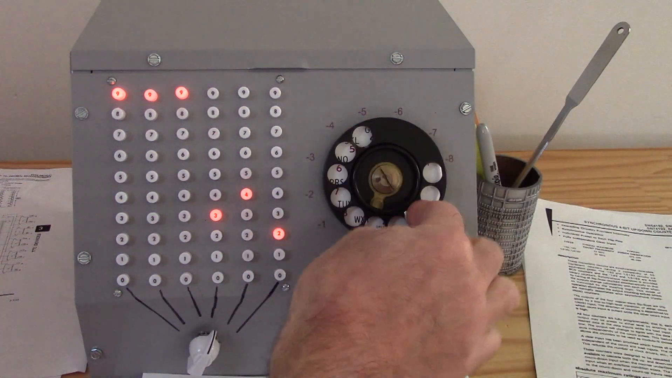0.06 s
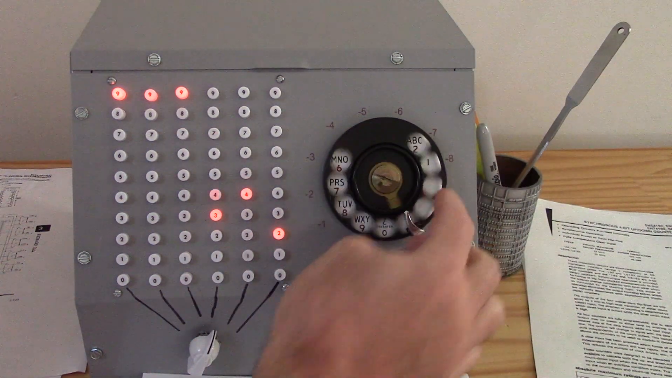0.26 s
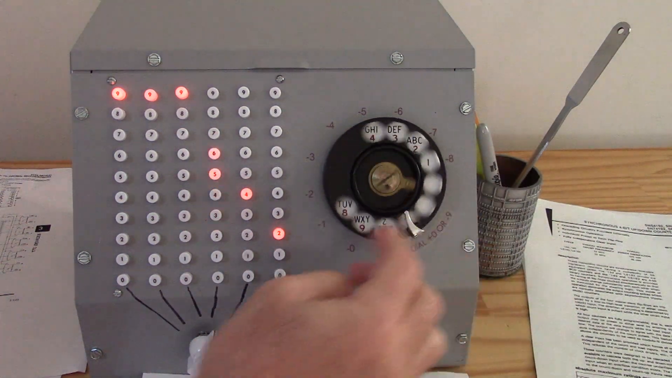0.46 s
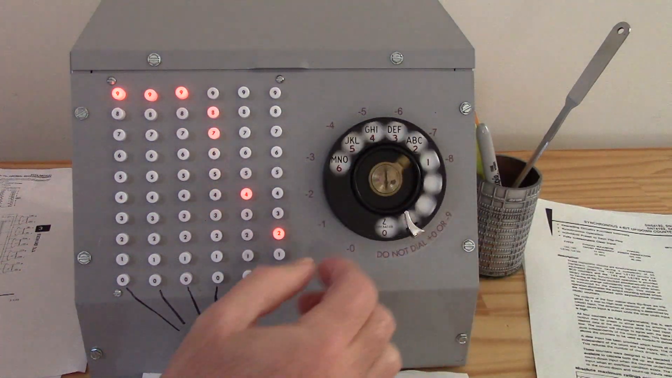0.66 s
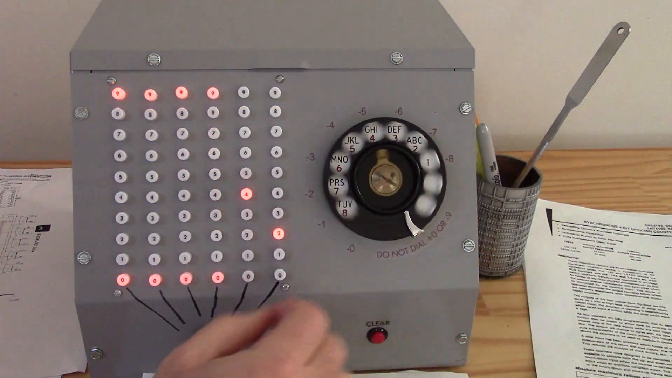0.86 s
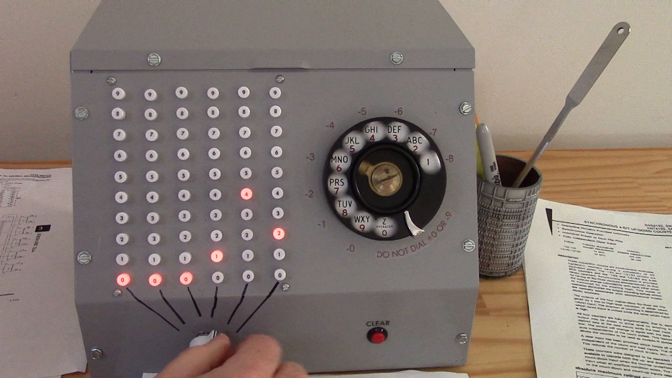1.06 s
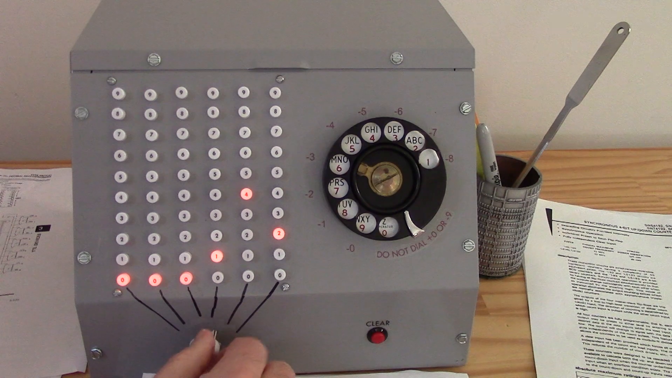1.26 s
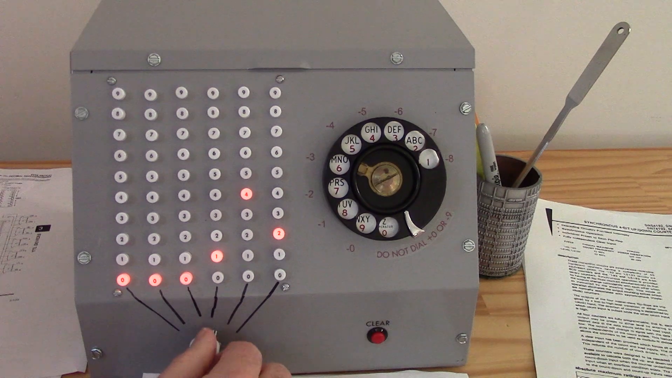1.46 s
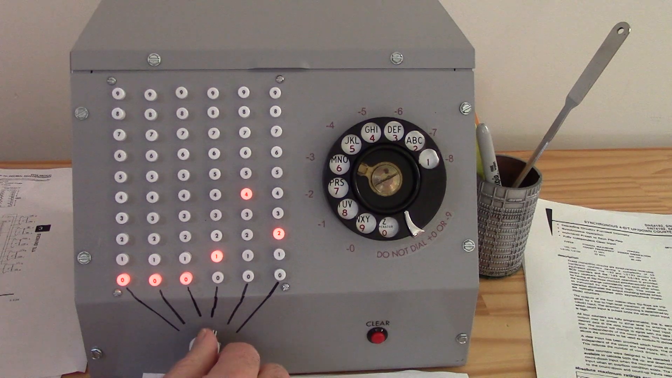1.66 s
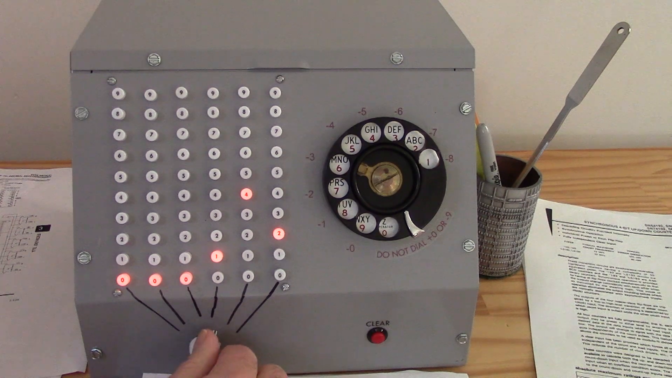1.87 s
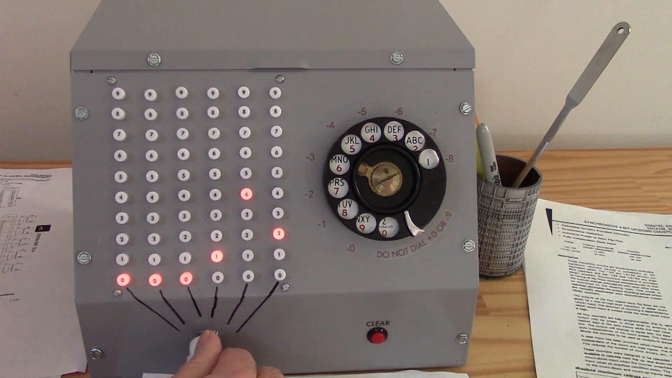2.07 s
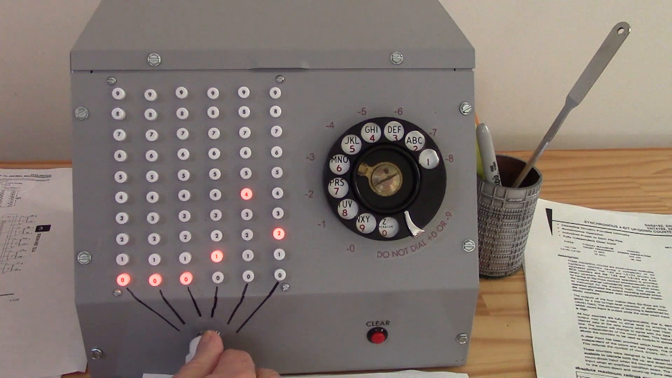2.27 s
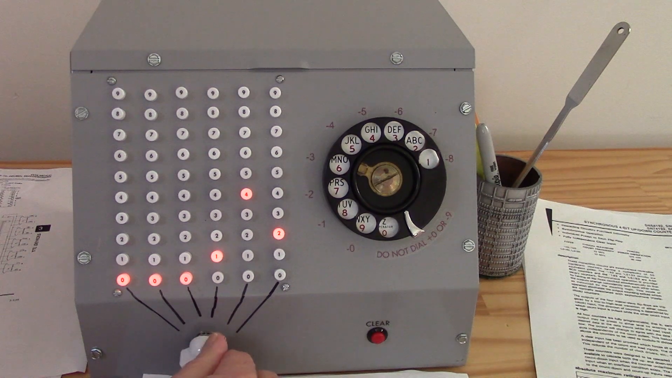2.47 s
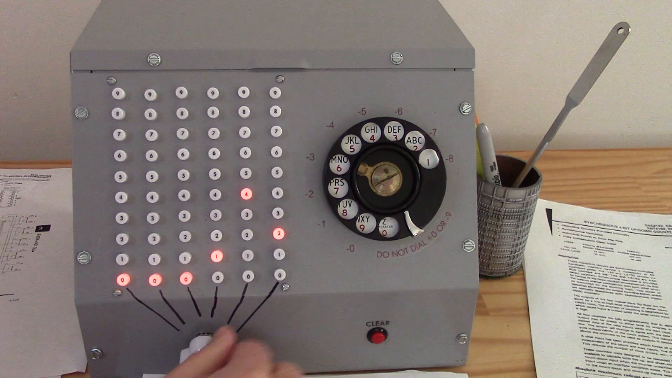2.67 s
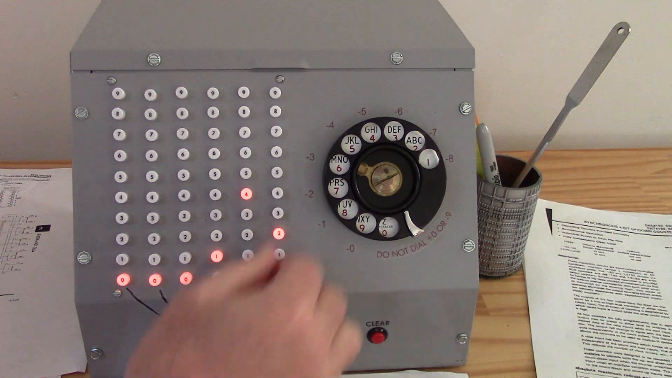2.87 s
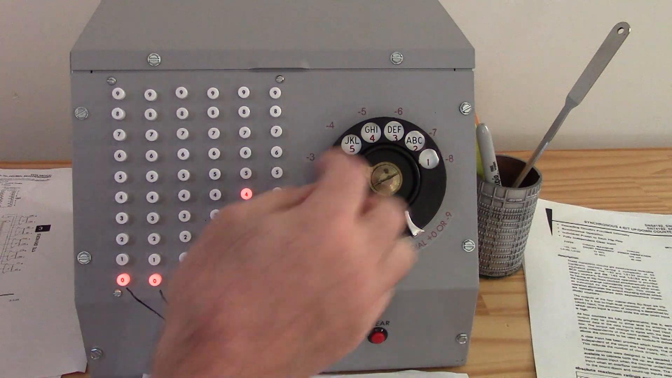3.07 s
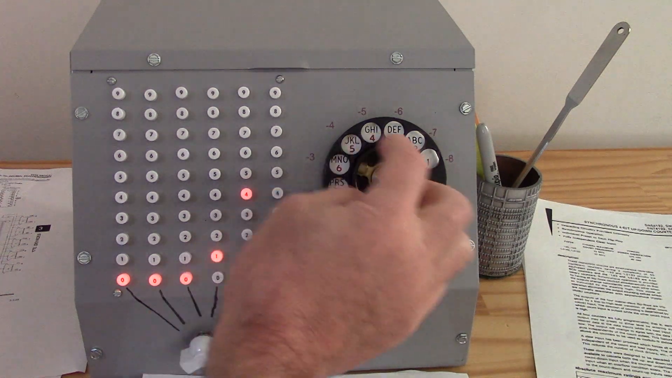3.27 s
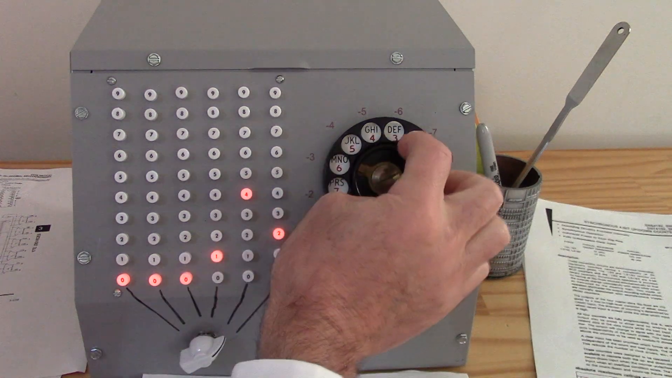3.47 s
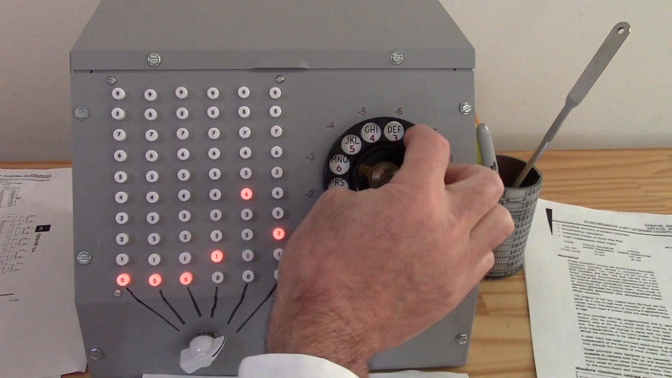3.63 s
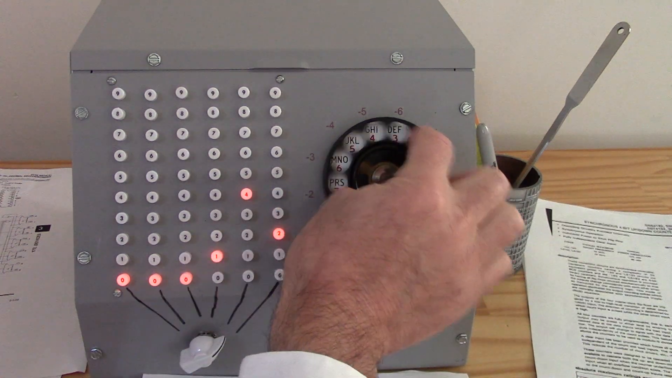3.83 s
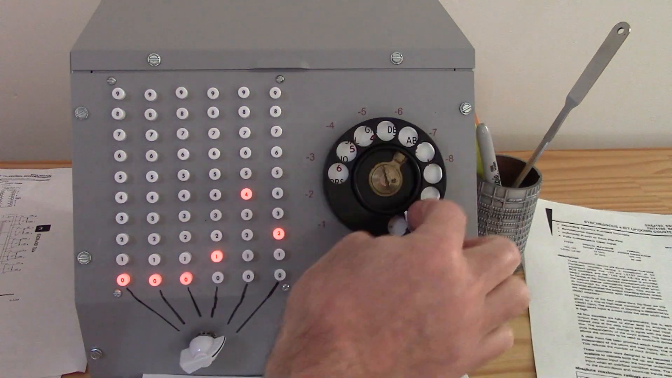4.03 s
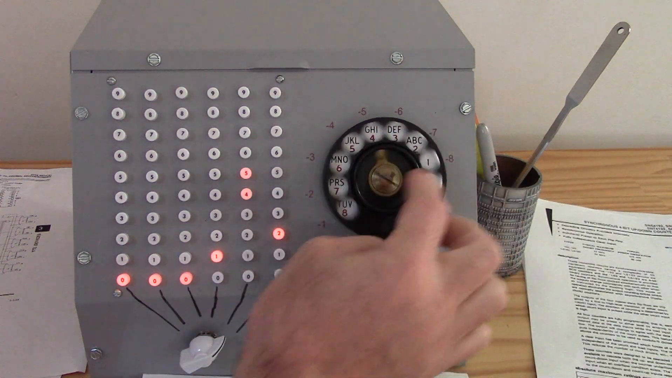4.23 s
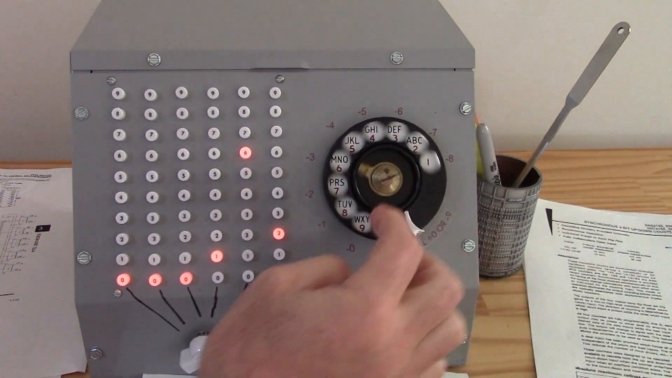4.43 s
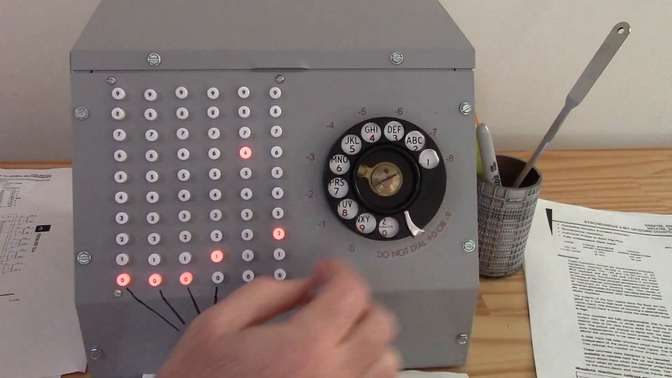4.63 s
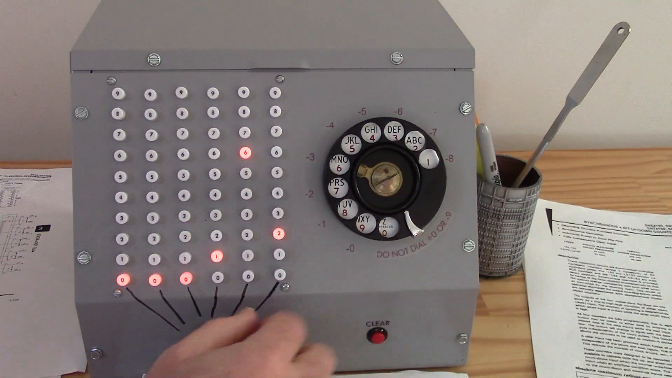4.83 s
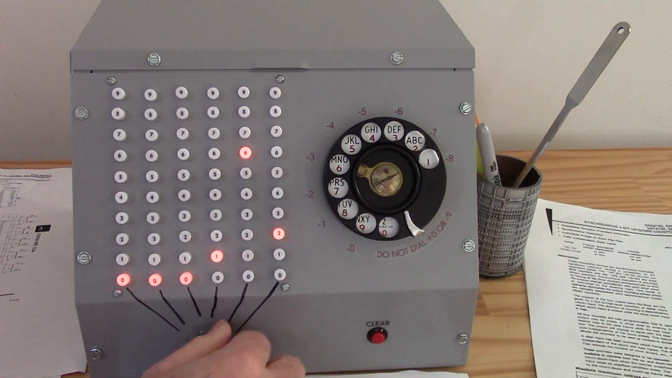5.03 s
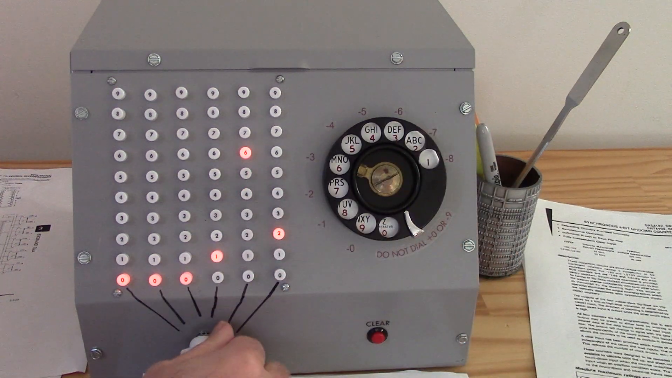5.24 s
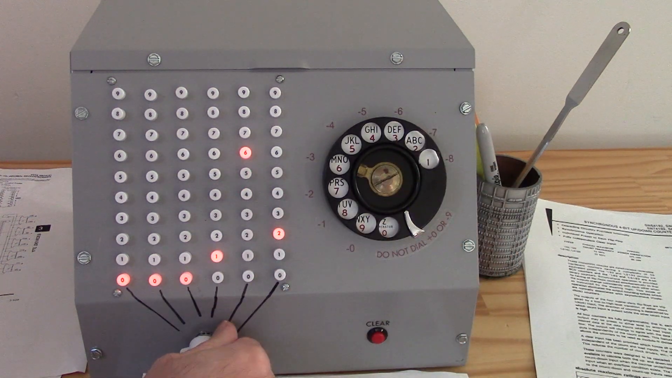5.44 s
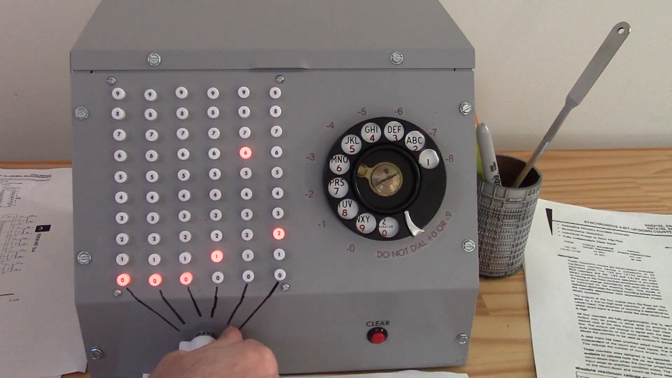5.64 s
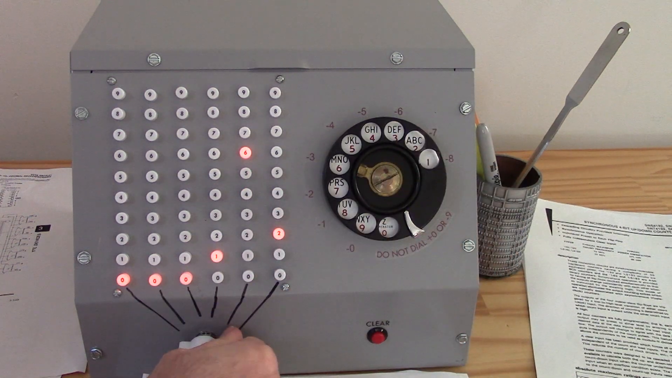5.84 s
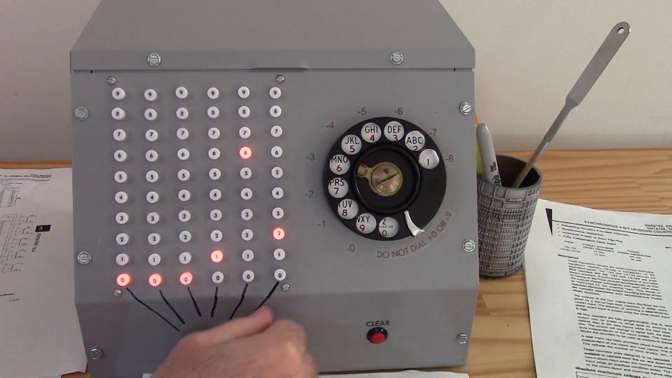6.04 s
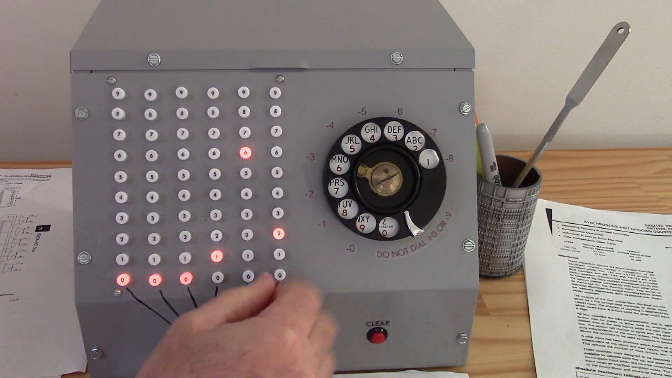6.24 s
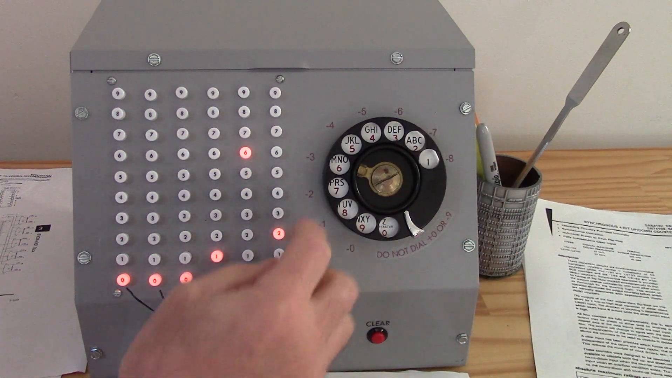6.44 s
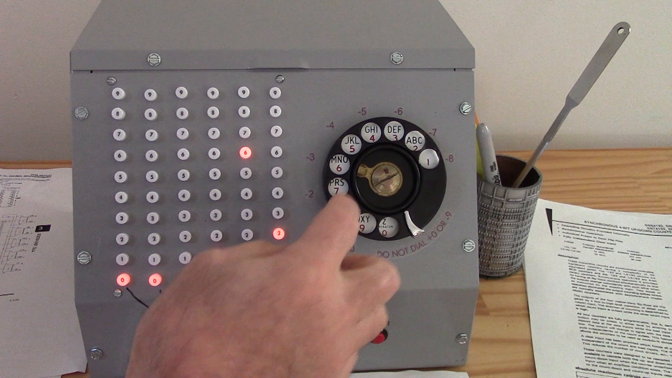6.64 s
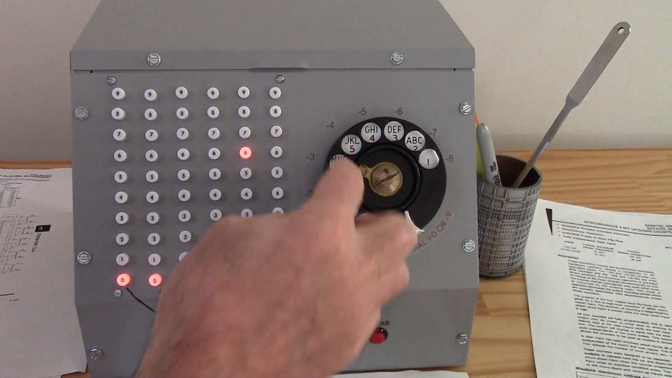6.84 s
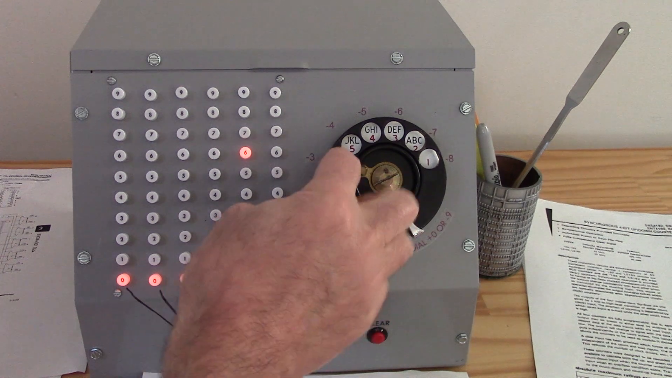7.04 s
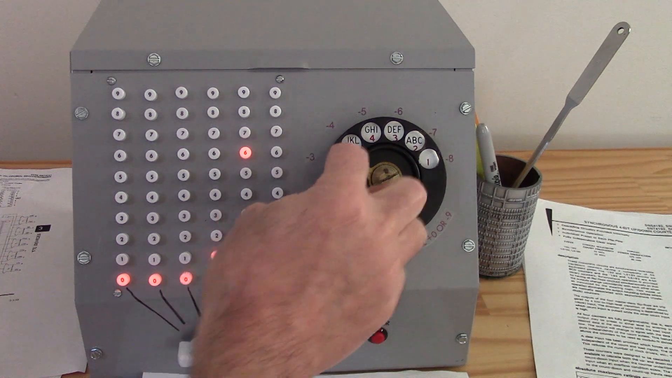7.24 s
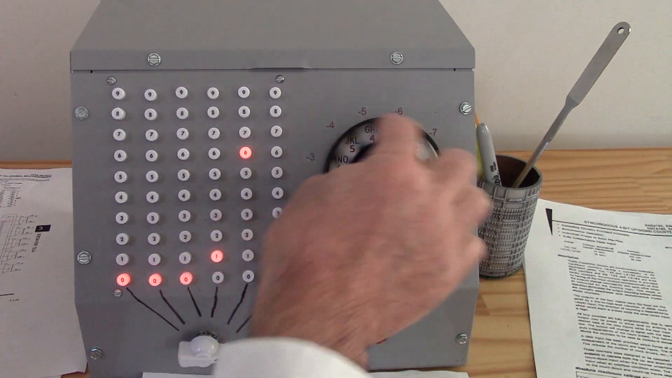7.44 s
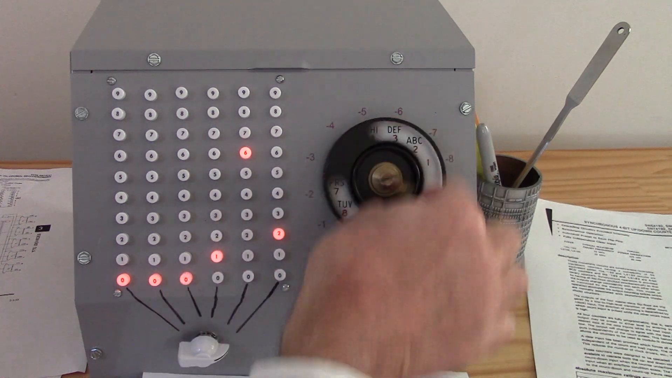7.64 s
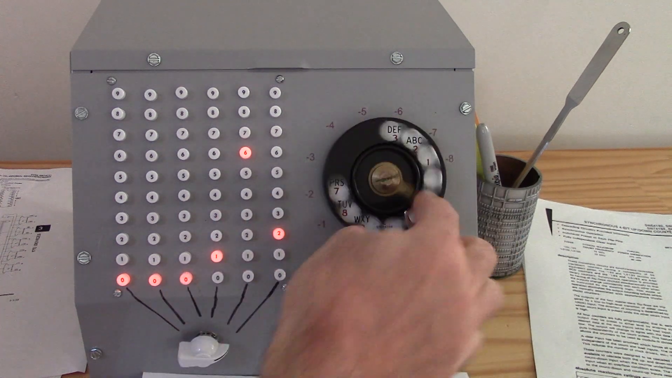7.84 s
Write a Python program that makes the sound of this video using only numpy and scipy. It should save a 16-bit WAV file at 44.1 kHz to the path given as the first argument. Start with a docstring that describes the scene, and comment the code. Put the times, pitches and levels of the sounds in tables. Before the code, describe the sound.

A rotary dial winds, whirrs back and clacks, alternating with a creaking, snapping selector knob on a metal box.

```python
"""A rotary dial and a selector knob on a homemade sheet-metal box, close by in a small room.
Over a faint mains hum, a finger winds the wheel against its stop; it whirrs home under the friction
of its governor and lands with a clack. The knob is dragged round in stick-slip creaks and snaps into
a detent. A shorter run of the dial follows, the knob creaks, snaps and creaks on, and at the very end
the wheel strikes its stop once more."""
import sys
import numpy as np
from scipy import signal
from scipy.fft import rfft, next_fast_len
from scipy.io import wavfile
from scipy.ndimage import uniform_filter1d

SR = 44100
rng = np.random.default_rng(int(sys.argv[2]) if len(sys.argv) > 2 else 0)


def wav_out(sig):
    """Save sig, one row per channel (or a flat mono array), as 16-bit PCM at SR to the path in sys.argv[1]."""
    wavfile.write(sys.argv[1], SR, np.round(np.clip(np.atleast_2d(sig).T, -1, 1) * 32767).astype(np.int16))


N = 348372
TIME = np.arange(N) / SR


def amp(db):
    """Amplitude ratio of a level in decibels."""
    return 10 ** (np.asarray(db) / 20)


def unit_rms(x):
    """Normalisation to an rms of 1."""
    return x / np.sqrt(np.mean(x ** 2) + 1e-20)


def log_interp(points, hz):
    """Interpolation of (frequency [Hz], value) points on a logarithmic frequency axis."""
    frequencies, values = np.transpose(points)
    return np.interp(np.log(hz + 1), np.log(frequencies + 1), values)


def add(mix, s, sound):
    """Superposition of a sound on the mix from time s."""
    part = mix[max(round(s * SR), 0):][:len(sound)]
    part += sound[:len(part)]


def strike(mix, s, sound, db):
    """Superposition of a transient, scaled so that its first 10 ms have an rms level of db."""
    onset_rms = np.sqrt(np.mean(sound[:SR // 100] ** 2) + 1e-20)
    add(mix, s, amp(db) * sound / onset_rms)


def colour(x, spectrum, tilt_db=0, size=4096):
    """Minimum-phase filtering by a spectrum, tilted by tilt_db per octave about 2 kHz."""
    hz = np.fft.rfftfreq(size, 1 / SR)
    db = log_interp(spectrum, hz) + tilt_db * np.log2(np.maximum(hz, 100) / 2000)
    log_gain = np.log(amp(np.r_[db, db[-2:0:-1]]))
    taps = np.fft.ifft(np.exp(np.conj(signal.hilbert(log_gain)))).real
    return signal.oaconvolve(x, taps[:size // 2])[:len(x)]


def noise(spectrum, envelope=1):
    """Spectral shaping of amplitude-modulated white noise, to an rms of 1."""
    return unit_rms(colour(envelope * rng.standard_normal(N), spectrum))


def cut(x, hz, kind):
    """Second-order low-pass or high-pass filtering."""
    return signal.sosfilt(signal.butter(2, hz, kind, fs=SR, output="sos"), x)


def excite(force, response):
    """Convolution of a force with an impulse response of unit energy."""
    return signal.oaconvolve(force, response / np.linalg.norm(response))[:len(force)]


def ring(modes, size=24000):
    """Free vibration: a sum of damped modes, with little radiation below the lowest."""
    t = TIME[:size]
    sines = sum(amp(db - 60 * t / t60) * np.sin(2 * np.pi * hz * t) * rng.choice([-1, 1])
                for hz, db, t60 in modes)
    return cut(sines, modes[0][0] / 2, "high")


def clack(spectrum, tilt_db, treble_s, bass_s, size=8192):
    """Scattering of a blow in the casing: noise with separate decay times for treble and bass."""
    t = TIME[:size]
    scatter = rng.choice([-1., 1.], size)
    bass = cut(scatter, 2400, "low") * np.exp(-t / bass_s) / np.sqrt(bass_s)
    treble = cut(rng.permutation(scatter), 2400, "high") * np.exp(-t / treble_s) / np.sqrt(treble_s)
    burst = bass + treble
    # equal energy in every broad band, so the struck part alone sets the colour
    band_db = 10 * np.log10(uniform_filter1d(abs(rfft(burst)) ** 2, 48) + 1e-9)
    white = colour(burst, np.c_[np.fft.rfftfreq(size, 1 / SR), -band_db])
    return colour(white, spectrum, tilt_db)


def stroke(peak_s, build_s, ease_s):
    """Envelope of a hand movement, 21 dB down at build_s before its peak and ease_s after."""
    away = np.maximum((peak_s - TIME) / build_s, (TIME - peak_s) / ease_s)
    return amp(-21 * np.minimum(away, 10) ** 1.5)


def held(rows, fade_s):
    """Trapezoidal envelope over rows of (start [s], end [s], level [dB])."""
    return sum(amp(db) * np.interp(TIME, [start - fade_s, start, end, end + fade_s], [0, 1, 1, 0])
               for start, end, db in rows)


def wander(samples):
    """Random fluctuation of rms 1: a moving average of white noise."""
    return unit_rms(uniform_filter1d(rng.standard_normal(N), samples))


# mains hum and whine: (frequency [Hz], level [dB])
HUM_TONES = [(119.8, -73.5), (180, -75), (5570, -82.5)]
# room noise: (frequency [Hz], level [dB])
AIR_SPECTRUM = [(15, -52), (25, -29.5), (92, -13.5), (102, -4), (123, -3), (145, -15), (185, -6.5),
                (309, -2.5), (463, -4.5), (754, -7.5), (962, -9), (1260, -10.5), (5280, -20.5),
                (13600, -29), (16000, -42.5)]


def background(air_db=-59.5):
    """Superposition of steady tones, mains hum and a faint whine, on broadband room noise."""
    hum = sum(amp(db) * np.sqrt(2) * np.sin(2 * np.pi * (hz * TIME + rng.random()))
              for hz, db in HUM_TONES)
    return hum + amp(air_db) * noise(AIR_SPECTRUM)


# finger on wheel: (time [s], level [dB], tilt [dB/octave], relative ring [dB], jolt level [dB])
WHEEL_KNOCKS = [(0.0405, -46, -2, 6, -49.5), (.087, -56.5, -11, 4.5, -58), (3.437, -37, -.5, 9.5, -47),
                (3.590, -39.5, -0.5, -3.5, -42), (4.054, -34, 3, -7, -42), (7.722, -48, 2.5, -3, -54.5),
                (7.738, -42.5, -9.5, -5, -52.5)]
# a knock on the wheel and a bump on the box: (frequency [Hz], level [dB])
KNOCK_SPECTRUM = [(88, -31), (150, -7), (1090, 5), (1430, -10), (2060, 5), (2360, -11), (3030, 0),
                  (5100, -19.5), (7500, -6.5), (15000, -32)]
BUMP_SPECTRUM = [(70, -25), (120, -10), (200, -0.5), (300, -7), (480, -21), (640, -7.5), (900, -20.5),
                 (2500, -39), (8000, -61.5)]
# finger wheel: (frequency [Hz], level [dB], T60 [s])
WHEEL_MODES = [(600, -12, .15), (2060, 0, .075), (2126, 3, 0.069), (2110, -5.5, .07), (3112, -23.5, .2),
               (3240, -20.5, .14), (3810, -4.5, .021), (4470, -14, 0.029), (6450, -21, .03)]


def wheel_knocks(jolt_lag_s=.007):
    """Impulsive excitation: a finger knocks the wheel, which rings and jolts the box."""
    out = np.zeros(N)
    for s, db, tilt_db, ring_db, jolt_db in WHEEL_KNOCKS:
        strike(out, s, clack(KNOCK_SPECTRUM, tilt_db, treble_s=.0022, bass_s=.01), db)
        strike(out, s, ring(WHEEL_MODES), db + ring_db)
        strike(out, s + jolt_lag_s, clack(BUMP_SPECTRUM, 1.3, treble_s=.01, bass_s=.025), jolt_db)
    return out


# turns of the wheel against its spring: (start [s], end [s], level [dB])
WINDINGS = [(.08, .22, -61), (3.67, 3.76, -62), (3.89, 4.19, -57), (7.18, 7.88, -62.5)]
# winding gears: (frequency [Hz], level [dB])
GEAR_SPECTRUM = [(90, -3.5), (180, 6.5), (330, -2.5), (650, -2.5), (1100, -11), (1600, -15.5), (2100, -8.5),
                 (2600, -26), (8000, -23.5), (15000, -36.5)]


def winding(rattle_db=3):
    """Amplitude-modulated noise: the gears rumble and rattle as the wheel is drawn round."""
    rattle = amp(rattle_db * wander(400))
    return held(WINDINGS, fade_s=.015) * noise(GEAR_SPECTRUM, rattle)


# nail and mechanism: (time [s], level [dB], tilt [dB/octave], ring frequency [Hz])
LIGHT_TICKS = [(0.2233, -47, 6.5, 7200), (3.5964, -42, -2, 7530), (3.912, -52.5, 11, 9870),
               (4.1775, -52, 13, 6840), (4.894, -56.5, -3, 3160), (5.0724, -58.5, -3.5, 3030),
               (6.0375, -60.5, 10.5, 7090), (6.517, -52, -0.5, 6700), (6.556, -54.5, -1.5, 7240),
               (6.571, -53, 2, 6190), (6.586, -44, 1.5, 4720), (7.3695, -52.5, 5, 10050)]
# one tick: (frequency [Hz], level [dB])
TICK_SPECTRUM = [(470, -46), (800, -5.5), (3100, -7.5), (3650, -11.5), (4860, -12.5), (5440, -6.5),
                 (10200, -14), (16000, -41.5)]


def light_ticks():
    """Brief contacts of nail and mechanism each excite one high, heavily damped mode."""
    out = np.zeros(N)
    for s, db, tilt_db, hz in LIGHT_TICKS:
        strike(out, s, clack(TICK_SPECTRUM, tilt_db, treble_s=.0012, bass_s=.004), db)
        strike(out, s, ring([(hz, 0, .012)]), db - 2)
    return out


# wheel on stop: (time [s], level [dB], tilt [dB/octave], relative dial ring [dB], relative boom [dB])
STOP_BLOWS = [(0.2493, -13.5, 1, -6.5, -14), (4.2049, -13, -1.5, -8, -9.5), (7.8908, -12, -1, -10, -19)]
# one spectrum for each blow: (frequency [Hz], level [dB])
STOP_SPECTRA = [
    [(71, -55), (120, -35.5), (181, -0.5), (378, -8.5), (473, -19.5), (617, -5.5), (968, -6), (1830, -14.5),
     (2240, -3.5), (2530, -13), (4140, -17), (5990, -17.5), (6500, -10), (10800, -16.5), (16000, -38.5)],
    [(47, -45.5), (80, -39.5), (190, -9.5), (338, -18.5), (471, -12), (751, -16), (839, -12.5),
     (1250, -9.5), (1490, -20.5), (1670, -9), (1820, -16.5), (3030, -10.5), (4330, -17.5), (6450, -3.5),
     (16000, -25)],
    [(120, -52.5), (200, -28.5), (1060, 5), (1560, -6), (2330, -1.5), (3020, -18), (3760, -5),
     (4040, -12.5), (5230, -10), (6520, -0.5), (16000, -20)],
]
# dial and box: (frequency [Hz], level [dB], T60 [s])
DIAL_MODES = [(2240, -4, .2), (3205, -14, .3), (3560, -12, .12), (4770, -18, .2), (6376, 5, .17),
              (6558, -8, .08), (7234, -9, .1), (8026, -6, .1)]
BOX_MODES = [(122.5, -30, 0.49), (177.7, -4.5, 0.49), (210, 0.5, 0.58), (258.8, -8, 0.24), (346, -9, 0.18),
             (442, -8, 0.32), (602, -7.5, 0.38), (813, -4.5, 0.41), (978, -4.5, 0.27), (1195, -10.5, 0.39),
             (1793, -0.5, 0.023)]


def stop_blows():
    """Impact on the finger stop sets the dial and the box into free vibration."""
    out = np.zeros(N)
    for (s, db, tilt_db, ring_db, boom_db), spectrum in zip(STOP_BLOWS, STOP_SPECTRA):
        graze = clack(spectrum, tilt_db, treble_s=.0029, bass_s=.006)
        crack = clack(spectrum, tilt_db + 2, treble_s=.0037, bass_s=.0018)
        rattle = clack(spectrum, tilt_db, treble_s=.011, bass_s=.028)
        strike(out, s - .0024, graze, db - 15)
        strike(out, s + .0008, crack, db - 5)
        strike(out, s, rattle, db)
        strike(out, s, ring(DIAL_MODES), db + ring_db)
        strike(out, s + .003, ring(BOX_MODES), db + boom_db)
    return out


# runs home: (start [s], end [s], first governor speed [turns/s], last governor speed [turns/s])
WHEEL_RETURNS = [(.27, 1.142, 93.4, 85), (4.225, 4.508, 86, 84.2)]
# added hum of the box while the governor wobbles harder: (start [s], end [s], level [dB])
GOVERNOR_WOBBLES = [(.72, .81, -47.5), (.93, 1.11, -51), (4.33, 4.46, -50)]
# whirr in the casing: (frequency [Hz], level [dB])
WHIRR_SPECTRUM = [(130, -27.5), (220, 1.5), (321, -10.5), (435, 0), (669, -6.5), (732, -3.5), (993, 1.5),
                  (1150, -8.5), (1790, -0.5), (2390, -4.5), (2660, -4), (4240, -6), (6890, -4),
                  (13100, -25.5), (16000, -28)]
# pawl: (frequency [Hz], level [dB], T60 [s])
PAWL_MODES = [(2660, -5, .018), (3030, -10, 0.044), (3560, -18.5, .045), (4250, -16.5, 0.027),
              (4670, -15.5, 0.034), (5730, -16.5, 0.045), (6660, -2.5, 0.022), (6867, -13, .03),
              (7460, 3, 0.0057), (8360, -6, .012), (10500, -13.5, .018), (12830, -22, .014)]


def governor(rub_db=-43, pawl_db=-46.5, waver_db=.87, box_hz=179, fade_in_s=.038):
    """Periodic friction: the governor rubs and ticks each turn; its wobble makes the box hum."""
    out = np.zeros(N)
    casing = clack(WHIRR_SPECTRUM, 0, treble_s=.0012, bass_s=.003)  # short echoes inside the dial
    wobble = amp(-55.5) + held(GOVERNOR_WOBBLES, fade_s=.056)
    for start, end, first_speed, last_speed in WHEEL_RETURNS:
        t = np.arange(start, end, 1 / SR)
        unwound = (t - start) / (end - start)
        speed = first_speed + (last_speed - first_speed) * unwound ** 2  # the spring weakens
        turns = np.cumsum(speed) / SR
        track = rng.standard_normal(490)  # roughness that recurs every turn
        fresh, chatter = rng.standard_normal((2, len(t)))
        roughness = fresh + .55 * track[(turns % 1 * len(track)).astype(int)]
        friction = roughness * (1 + .5 * np.cos(2 * np.pi * 3 * turns))  # three swells a turn
        impulses = np.diff(np.floor(turns), prepend=0) * amp(1.2 * chatter)
        ticks = amp(pawl_db) * excite(unit_rms(impulses) + .45 * unit_rms(friction), ring(PAWL_MODES))
        rub = amp(rub_db) * unit_rms(excite(friction, casing))
        speed_db = 11.5 * np.log2(speed / 84.8)  # faster is louder
        whirr = (rub + ticks) * amp(speed_db + waver_db * wander(2500)[:len(t)])
        hum_phase = 2 * np.pi * box_hz * t + .23 * wander(3000)[:len(t)]
        hum = np.interp(t, TIME, wobble) * np.sin(hum_phase)
        add(out, start, (whirr + hum) * np.minimum((t - start) / fade_in_s, 1))
    return out


# wheel at rest: (time [s], level [dB], tilt [dB/octave], rebound delay [s], relative rebound [dB])
WHEEL_LANDINGS = [(1.1404, -28.5, 4, .011, 0.5), (4.5075, -24.5, 2, .011, -0.5)]
# one landing: (frequency [Hz], level [dB])
LANDING_SPECTRUM = [(71, -37), (120, -87), (231, -3.5), (402, -18.5), (684, -9), (874, 0), (1050, 4.5),
                    (1400, -10), (1790, -9), (2480, -17.5), (3660, -19), (4780, -27.5), (7200, -20.5),
                    (10600, -26.5), (16000, -51)]


def landings(lid_hz=258.4, lid_t60_s=.62):
    """Impact and rebound: the wheel lands twice, and the second blow rings the box and its lid."""
    out = np.zeros(N)
    for s, db, tilt_db, delay, rebound_db in WHEEL_LANDINGS:
        strike(out, s, clack(LANDING_SPECTRUM, tilt_db, treble_s=.0069, bass_s=.0015), db)
        rebound = clack(LANDING_SPECTRUM, tilt_db - 3.5, treble_s=.0015, bass_s=.012)
        strike(out, s + delay, rebound, db + rebound_db)
        strike(out, s + delay, ring(BOX_MODES), db - 17)
        strike(out, s + delay, ring([(lid_hz, 0, lid_t60_s)]), db - 20.5)
    return out


# skin on knob and panel: (peak time [s], build-up [s], easing [s], level [dB])
SKIN_SLIDES = [(1.22, 0.18, 0.064, -59), (2.734, 0.055, 0.059, -58.5), (3.572, 0.043, .03, -59.5),
               (5.206, .1, .08, -62.5), (5.302, 0.064, 0.14, -53), (6.319, 0.044, 0.038, -56),
               (6.515, 0.022, 0.087, -54.5)]
# sliding skin: (frequency [Hz], level [dB])
SKIN_SPECTRUM = [(1000, -13), (3000, -1), (5000, -0.5), (7500, 6.5), (11000, -4.5), (16000, -9.5)]


def skin_slides(grain_db=2.6):
    """Sliding friction of skin gives a grainy hiss that follows each stroke."""
    sliding = sum(amp(db) * stroke(s, build, ease) for s, build, ease, db in SKIN_SLIDES)
    return sliding * noise(SKIN_SPECTRUM, amp(grain_db * wander(150)))


# fingers work the knob faintly: (start [s], end [s], level [dB])
KNOB_HOLDS = [(1.3, 1.87, -61.5), (5.24, 5.8, -55)]
# drags: (peak time [s], build-up [s], easing [s], level [dB], tilt [dB/octave], slip rate [1/s])
KNOB_DRAGS = [(1.914, .07, 0.13, -39, -.3, 121), (2.03, .09, 0.12, -34, 2.5, 172),
              (5.246, .04, 0.024, -59, 0.5, 104), (5.345, .09, 0.096, -33.5, 1.8, 130),
              (5.436, .025, 0.044, -39, -1.5, 130), (5.679, .04, 0.074, -42, 3, 140),
              (5.892, .07, 0.036, -33, 0.5, 69), (6.06, .045, 0.057, -46, 2, 83)]
# rubbing shaft: (frequency [Hz], level [dB])
SHAFT_SPECTRUM = [(59, -72), (100, -62.5), (138, -26.5), (261, 4.5), (315, -11.5), (361, 1.5), (604, -4.5),
                  (681, -17), (993, 1.5), (1520, -20), (2150, -19), (2780, -28), (6000, -49), (7800, -61.5),
                  (13200, -120)]
# panel: (frequency [Hz], level [dB], T60 [s])
PANEL_MODES = [(195, -19, 0.36), (268.8, -6.5, 0.21), (374, 5.5, 0.034), (470, -2.5, 0.075),
               (634, -15.5, 0.48), (869, -7, 0.1), (1022, -2, 0.063), (1203, -46, 0.023)]


def knob_creak(slip_db=-5, rub_db=-7, grit_db=-44, fidget_db=3, sag_octaves=1.5):
    """Stick-slip friction: uneven slips of the shaft drive the panel modes over a dull rub."""
    uneven = np.exp(.3 * wander(300))
    panel = ring(PANEL_MODES)
    rub = noise(SHAFT_SPECTRUM)
    out = held(KNOB_HOLDS, fade_s=.042) * amp(fidget_db * wander(2000)) * rub
    for s, build, ease, db, tilt_db, slips_per_s in KNOB_DRAGS:
        part = (TIME > s - 2 * build) & (TIME < s + 2 * ease + .1)
        drag = amp(db) * stroke(s, build, ease)[part]
        eased = np.clip((TIME[part] - s) / ease, 0, 1)
        rate = slips_per_s * uneven[part] / 2 ** (sag_octaves * eased)  # slower as the hand eases
        slip_count = np.floor(np.cumsum(rate) / SR)
        slips = drag * unit_rms(np.diff(slip_count, prepend=0))
        ringing = amp(slip_db) * excite(slips, panel)
        creak = ringing + amp(rub_db) * drag * rub[part] + amp(grit_db) * slips
        out[part] += colour(creak, [(500, 2 * tilt_db)], tilt_db)  # tilted about 500 Hz
    return out


# shifts of the knob: (time [s], level [dB])
KNOB_NUDGES = [(1.321, -51), (1.548, -78), (2.090, -47), (2.108, -39), (2.142, -43.5), (2.184, -45.5),
               (2.288, -42), (2.786, -47.5), (5.294, -41.5), (5.53, -44), (5.58, -45)]


def knob_nudges():
    """Each shift of the knob on its shaft is a single damped transient."""
    out = np.zeros(N)
    for s, db in KNOB_NUDGES:
        strike(out, s, clack(SHAFT_SPECTRUM, -.6, treble_s=.011, bass_s=.004), db)
    return out


# ball into notch: (time [s], level [dB], tilt [dB/octave], relative panel thump [dB])
DETENT_SNAPS = [(2.4412, -16.5, 2, -13.5), (5.6193, -24, 3.9, -1.5)]
# one spectrum for each notch: (frequency [Hz], level [dB])
DETENT_SPECTRA = [
    [(59, -60.5), (100, -21), (239, 0), (721, -1), (991, 0.5), (1480, -6.5), (1650, -1), (2080, -1.5),
     (2690, -16), (3700, -19), (5650, -11), (6990, -15), (11600, -15), (13500, -19.5), (16000, -30)],
    [(59, -43), (100, -17), (206, 1), (381, 4.5), (705, -18), (1010, -48), (1170, -14.5), (2220, -8.5),
     (2580, -30), (2990, -19.5), (4980, -31), (7770, -19), (8460, -26.5), (13200, -32), (16000, -50)],
]
# detent spring: (frequency [Hz], level [dB], T60 [s])
SPRING_MODES = [(1657, 11, 0.061), (2220, -10.5, 0.29), (2330, -13, 0.18), (5430, -6, 0.44),
                (5250, -9, 0.33), (5450, -13, 0.54), (5740, -1, 0.26), (8480, -11, .3)]


def detent_snaps():
    """Snap-through: the ball rolls off its ridge into the next notch, ringing panel and spring."""
    out = np.zeros(N)
    for (s, db, tilt_db, thump_db), notch in zip(DETENT_SNAPS, DETENT_SPECTRA):
        roll = clack(SHAFT_SPECTRUM, 8.6, treble_s=.012, bass_s=.012)
        graze = clack(notch, tilt_db - 8.5, treble_s=.0023, bass_s=.002)
        slam = clack(notch, tilt_db, treble_s=.0058, bass_s=.017)
        strike(out, s - .009, roll, -42)
        strike(out, s - .0014, graze, db - 21.5)
        strike(out, s, slam, db)
        strike(out, s + .0008, ring(PANEL_MODES), db + thump_db)
        strike(out, s, ring(SPRING_MODES), db - 19)
    return out


# fingertip on box: (time [s], level [dB], tilt [dB/octave])
BOX_BUMPS = [(3.609, -47.5, 1), (3.643, -51.5, -6.5), (7.037, -45.5, -2.5), (7.151, -55, -4.5),
             (7.788, -47.5, -6.5), (7.842, -45.5, 0.5)]


def box_bumps():
    """Soft impact: a fingertip excites mainly the low frequencies of the box."""
    out = np.zeros(N)
    for s, db, tilt_db in BOX_BUMPS:
        strike(out, s, clack(BUMP_SPECTRUM, tilt_db, treble_s=.01, bass_s=.028), db)
    return out


# reverberation time of the room: (frequency [Hz], T60 [s])
ROOM_DECAY = [(100, 0.3), (250, 0.45), (1000, 0.63), (3000, 0.68), (7000, 0.6), (15000, 1)]


def room(x, build_up_s=.0054):
    """Reverberation: a diffuse field builds up, then each band decays at its own rate."""
    hz, t, bands = signal.stft(rng.standard_normal(SR), SR, nperseg=256)
    decay = amp(-60 * t / log_interp(ROOM_DECAY, hz)[:, None])
    tail = signal.istft(bands * decay, SR, nperseg=256)[1][:SR]
    onset = 1 - np.exp(-(TIME[:SR] / build_up_s) ** 2)
    spectrum = [(100, 22), (400, 11), (1200, 3), (4000, 3.5), (8000, -2), (15000, -10)]
    return excite(x, colour(tail * onset, spectrum))


# left-right difference, of the sound and of a faint added noise: (frequency [Hz], level [dB])
SIDE_SPECTRUM = [(40, -17.5), (125, -42.5), (250, -42), (1000, -45), (4000, -20.5), (14000, -28)]
SIDE_NOISE_SPECTRUM = [(15, -44.5), (25, -13.5), (558, -0.5), (604, -4), (1390, -10), (2500, -14),
                       (8100, -27), (15000, -45.5)]


def scene(box_cutoff_hz=150):
    """Superposition of direct and reverberant sound, straight ahead: left and right hardly differ."""
    stops, home, whirr = stop_blows(), landings(), governor()
    snaps = detent_snaps() + knob_nudges()
    creak = knob_creak()
    hand = wheel_knocks() + light_ticks() + box_bumps() + skin_slides() + winding()
    direct = stops + home + whirr + snaps + creak + hand
    reverb = room(amp(-12.5) * (stops + hand) + amp(-11.5) * (home + whirr)
                  + amp(-11) * snaps + amp(-25.5) * creak)
    mid = cut(direct + reverb, box_cutoff_hz, "high") + background()  # the box radiates little bass
    quadrature = signal.hilbert(colour(mid, SIDE_SPECTRUM), next_fast_len(N)).imag[:N]
    side = quadrature + amp(-67) * noise(SIDE_NOISE_SPECTRUM)
    return np.array([mid + side, mid - side])


def record(dry):
    """Clipping at full scale, then band limiting at 16.1 kHz."""
    low_pass = signal.firwin(255, 16100, window=("kaiser", 9), fs=SR)
    return signal.oaconvolve(np.clip(dry, -1, 1), low_pass[None], "same")


dry = scene()
out = record(dry)
wav_out(out)
```